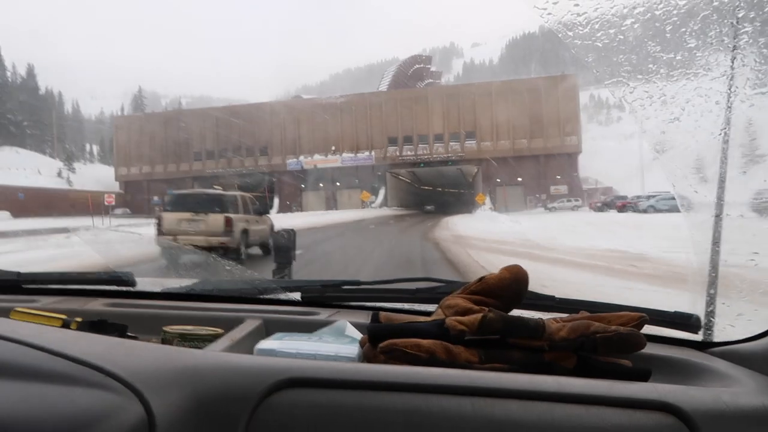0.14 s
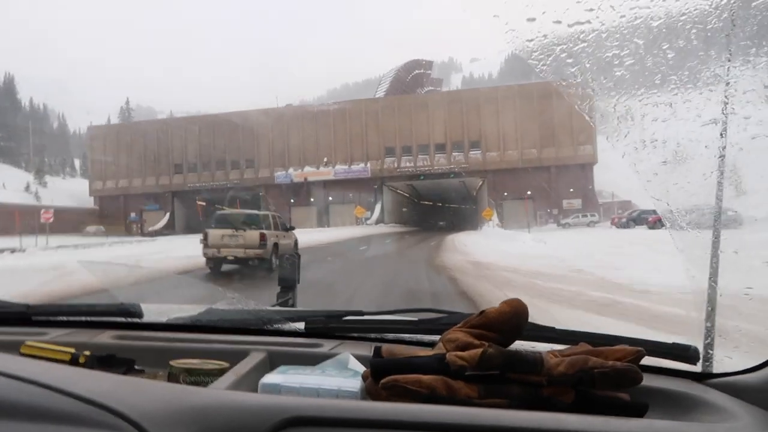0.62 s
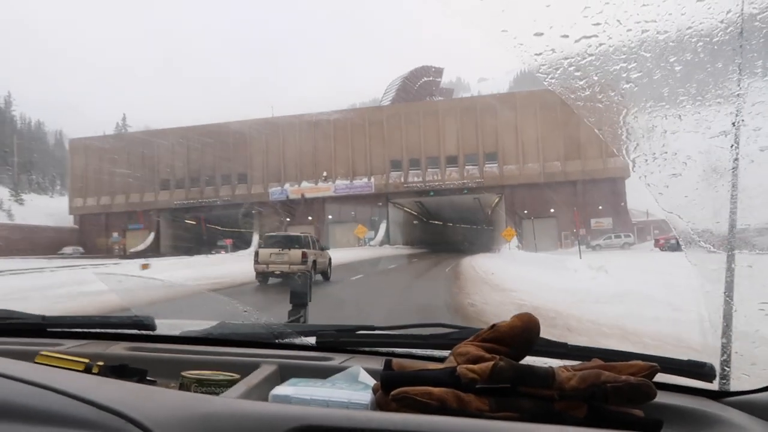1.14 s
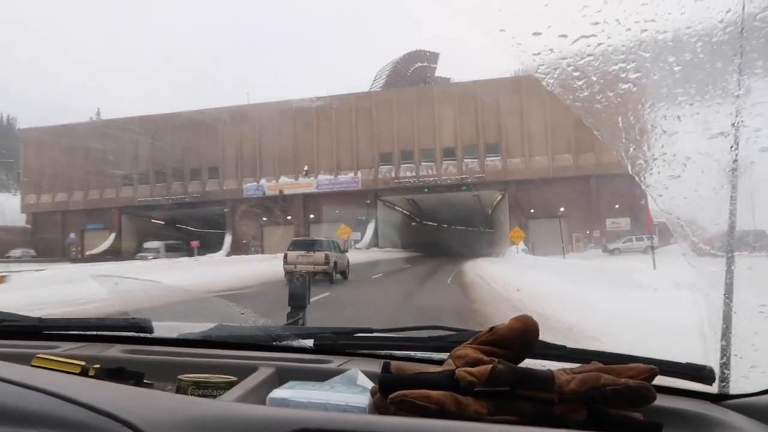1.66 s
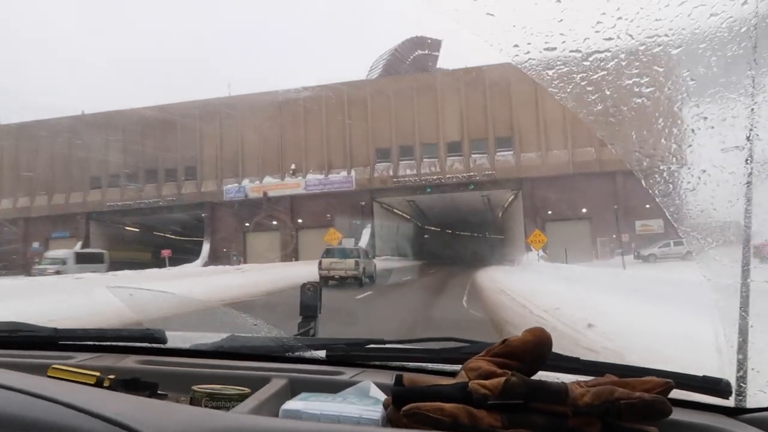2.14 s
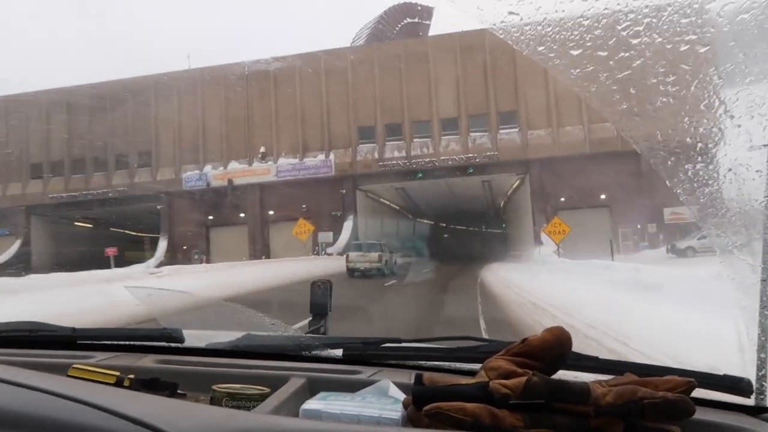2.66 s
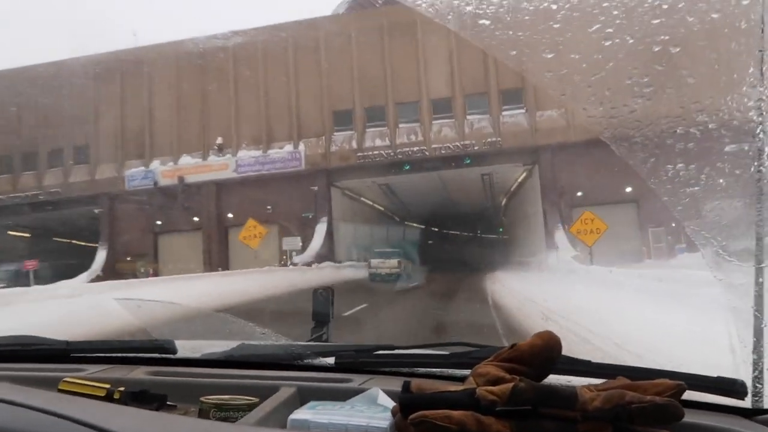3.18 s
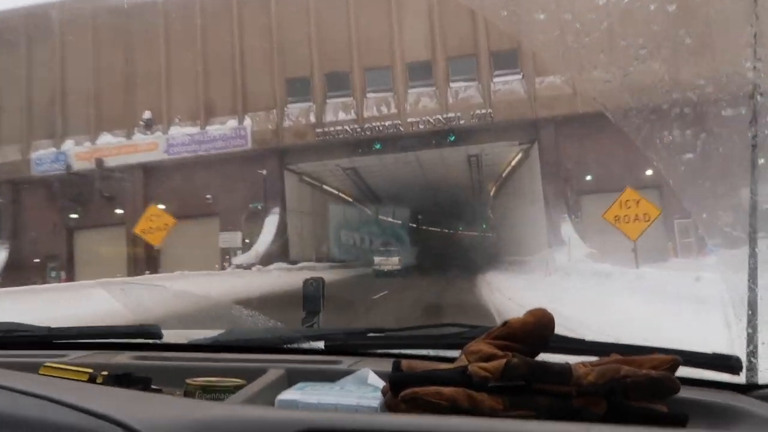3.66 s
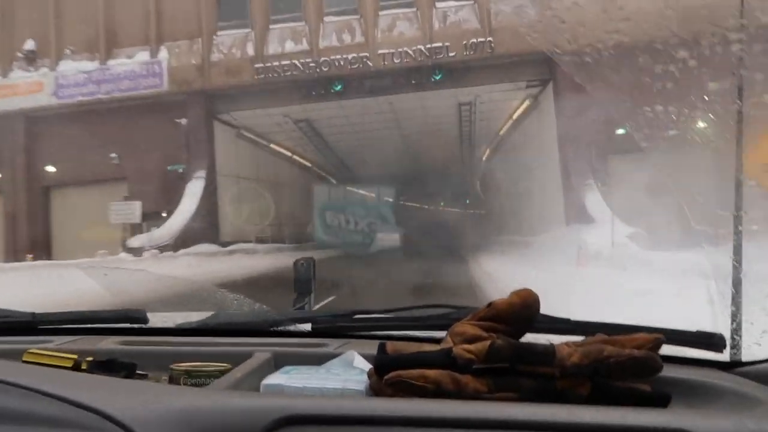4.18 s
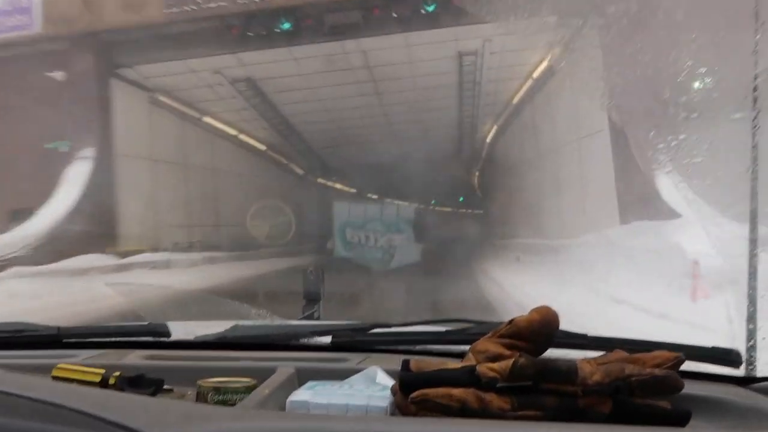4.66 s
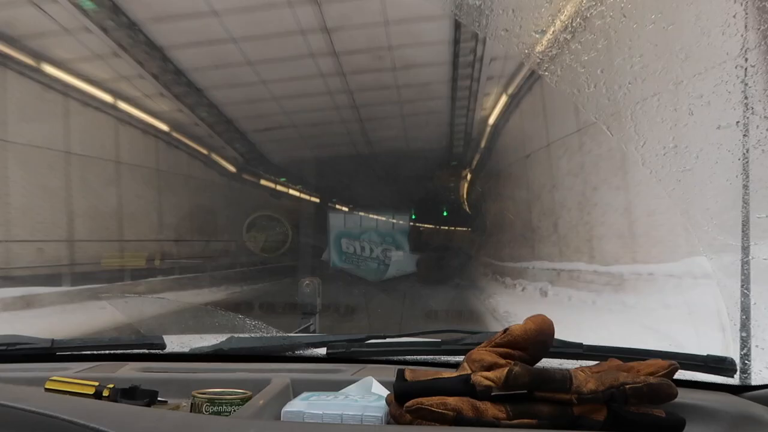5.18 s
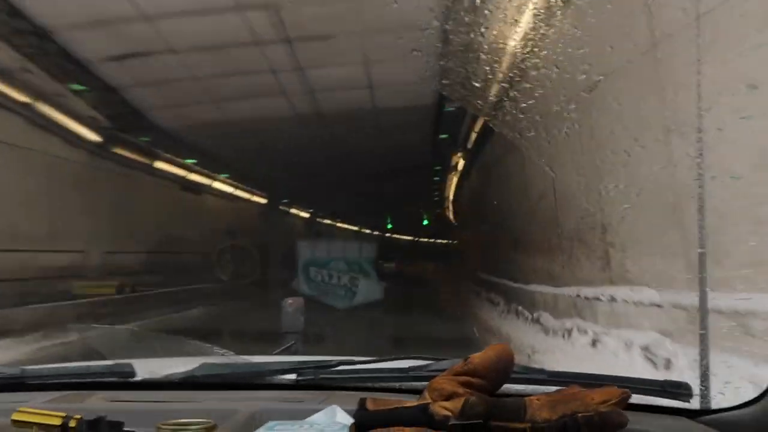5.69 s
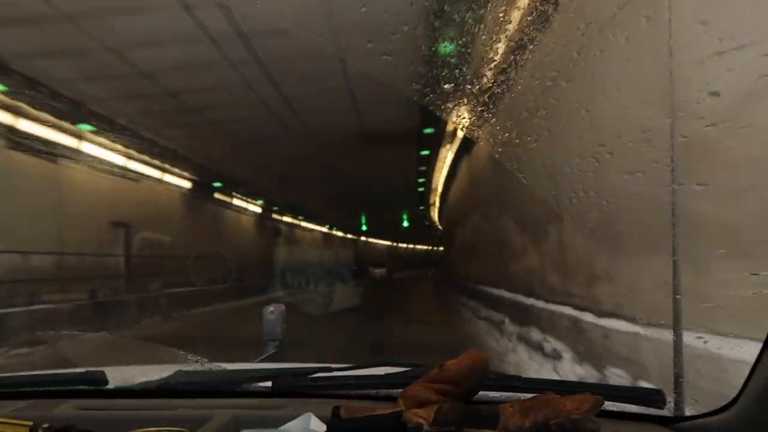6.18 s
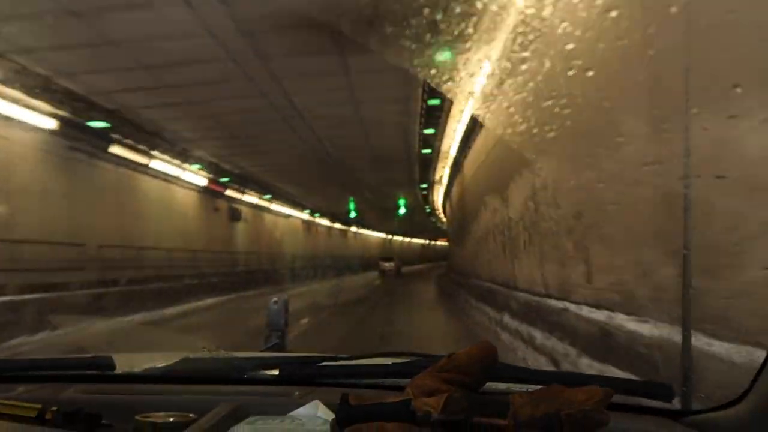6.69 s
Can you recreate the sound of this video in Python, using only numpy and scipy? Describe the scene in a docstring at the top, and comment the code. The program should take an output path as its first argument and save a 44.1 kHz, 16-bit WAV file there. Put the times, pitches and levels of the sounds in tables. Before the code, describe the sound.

Close inside a large pickup cab at nearly steady speed: thick low road rumble dominates, with a smooth eight-cylinder drone and thin gear whine beneath. Soft engine clatter, faint fast metallic ringing and light wet hiss sit above. Small bumps make the bass surge and the level dip briefly. Towards the end tunnel walls return a little midrange tyre noise.

```python
"""Inside the cab of a large eight-cylinder pickup at nearly steady speed on a wet road, nearing and entering a tunnel.
Road rumble is band-shaped noise; the engine gives sine orders, a gear whine and a clatter repeated every cycle.
Metal rings pulse once a cycle, air and spray hiss above, and the walls throw tyre noise back.
At each bump the rumble surges against the rest and the overall level dips, then creeps back.
Two close microphone ports hear it with a tiny bass lag and diffuse noise between them; one faint dull knock falls."""
import sys
import numpy as np
from scipy import signal
from scipy.fft import rfft, irfft, next_fast_len
from scipy.io import wavfile

SR = 44100
rng = np.random.default_rng(int(sys.argv[2]) if len(sys.argv) > 2 else 0)


def master_out(mix):
    """Clip the mix to full scale and print it as 16-bit PCM to the path in sys.argv[1]."""
    frames = np.transpose(np.atleast_2d(mix))
    ceiling = np.clip(frames, -1, 1)
    pcm = np.round(ceiling * 32767).astype(np.int16)
    wavfile.write(sys.argv[1], SR, pcm)


def boost_factor(decibels):
    """Convert a level in decibels to a linear amplitude factor."""
    exponent = np.asarray(decibels, float) / 20
    return 10 ** exponent


N = 300762   # samples

# Levels "re overall" are gains against the overall level curve; spectra give relative level per Hz.
# Road rumble in the cab: [f/Hz, level/dB]
RUMBLE = [(15, -60.5), (25, -40.5), (50, -24), (80, -19), (116, -2), (129, 2), (143, -5), (165, -2),
          (188, -10), (220, -6), (270, -13.5), (320, -33.5), (420, -29), (550, -50)]
# Roughness of the road, as rumble before the bump surges, re overall: [t/s, level/dB]
ROUGHNESS = [(0, 17), (.6, 17), (1.3, 18.5), (2.0, 17), (2.5, 17), (3.3, 17.5), (4.2, 17), (4.9, 17),
             (5.5, 18.5), (6.1, 18), (6.82, 16.1)]
# Bumps in the road and the dip each gives the overall level: [t/s, dip/dB]
BUMPS = [(0.204, 1.1), (0.612, 2.5), (0.736, 2), (0.929, 1.0), (1.494, 3), (1.919, 5), (2.168, 2),
         (2.624, 3), (3.229, 3), (3.41, 0.54), (3.798, 2.5), (3.938, 3), (4.447, 3.5), (4.705, 2),
         (5.059, 3.5), (5.507, 1.75), (5.742, 3.5), (6.346, 5), (6.659, 1)]
SURGE_SHARE = .9   # dB of rumble surge per dB of dip
SURGE_LEAD_S, SURGE_RISE_S, SURGE_FALL_S = 0.032, 0.031, .13
TOP_DB, START_DIP_DB = -28.0, 5.5   # level that the creep heads for; dip still left at the start
DROP_S, CREEP_S = 0.016, 0.93   # time constants of the dip and of the creep back

# Engine speed, as the pitch of the 28th multiple of the cycle rate: [t/s, f/Hz]
SPEED = [(0.0, 462.8), (0.07, 459.5), (0.51, 459.5), (1.75, 464.5), (3.15, 466.1), (4.71, 463.9),
         (6.82, 463.6)]
# Clean engine orders: [multiple of the cycle rate]
ORDER = [3, 4, 5, 8, 10, 11, 16, 18, 21, 24, 29, 35, 40, 44, 53, 54, 57, 59, 63, 64, 72, 74, 79, 84, 91, 96,
         101, 115, 120, 167]
# Their mean levels re overall, in the same sequence: [level/dB]
ORDER_DB = [-9, -3.5, 0.5, 12, -3, -8.5, -14.5, -3, -10.5, -15, -15.5, -21, -12, -15.5, -19, -26, -28.5,
            -18.5, -27.5, -30.5, -17.5, -17.5, -25.5, -18, -29, -20.5, -26, -24.5, -26, -27]
# Gear whine re overall, before its own swell: [t/s, level/dB]
WHINE = [(0, -3.5), (.8, 0.2), (2.2, -3.5), (3.5, 0.5), (4.7, -2.1), (5.4, -1.5), (6.82, -2.3)]
# Engine noise, low, middle and high: [f/Hz, level/dB] each
GROWL = [(200, -36), (300, 1.5), (425, -7), (470, -5), (505, -5.5), (575, -13), (700, -10), (830, -15),
         (950, -16.5), (1200, -44)]
ROAR = [(800, -18.5), (950, -9.5), (1080, 2.5), (1160, -6.5), (1230, 0), (1400, 1), (1480, 0), (1620, -4.5),
        (1720, -2), (1900, -8), (2230, -6.5), (2450, -6), (2750, -8), (2950, -19.5), (3300, -20)]
HISS = [(2600, -15), (3100, -4), (4000, -8.5), (4600, -9), (5300, -10), (6000, -11.5), (6800, -13.5),
        (7600, -17.5), (8500, -25.5), (9500, -22.5), (11000, -29), (13000, -22.5), (15000, -37)]
GROWL_DB, ROAR_DB, HISS_DB = 2, -7.5, -18.5   # re overall, in the open
# Repeating part of the engine noise against its steady part: [f/Hz, level/dB]
CLATTER = [(300, -12), (600, -6), (900, -3), (1500, -2), (2200, -2), (2800, -3), (3300, -7), (6000, -12)]
# Bulkhead resonances that the clatter excites along with the rings: [f/Hz, level/dB]
BULKHEAD = [(1500, -26), (1600, -2.5), (1690, 1.3), (1780, -18.5), (2450, -24.5), (2650, -12.5), (2780, -9),
            (2900, -30)]
BULKHEAD_DB, BULKHEAD_FOLLOWS = -14.5, .6   # mean re overall; share of the rings' swing
# Metal rings excited once a cycle: [f/Hz, pitch wander/Hz, level among them/dB, place in the cycle 0-1]
RINGS = [(5240, 34, 0, .77), (5920, 30, -10, .77), (6700, 40, -9, .3), (7110, 20, -14, .77),
         (4820, 25, -9, .25), (4960, 25, -10, .5), (5480, 30, -11, .1), (6300, 60, -8, .6)]
# Gain of all the rings re overall: [t/s, level/dB]
RINGING = [(0, -33), (.45, -27), (1.2, -29), (1.7, -27), (2.5, -27.5), (3.1, -26), (3.6, -31), (4.5, -33),
           (5.2, -31), (6.82, -34)]

# How closely walls surround the road: [t/s, share 0-1]
WALLED = [(0, 0.01), (2.6, 0.3), (3.8, 0.2), (5.2, 0.4), (6.2, 1), (6.82, 0.9)]
# Tyre noise thrown back by the walls: [f/Hz, level/dB]
WALL_ECHO = [(600, -27), (800, -6.5), (1050, -2), (1300, -0.5), (1500, -10), (1800, -30.5)]
WALL_ECHO_DB = -6.5   # re overall, when fully walled
WALL_ROAR_DB, WALL_HISS_DB, WALL_AROUND_DB = -0.5, 0.2, 0.1   # change when fully walled
# Slush on the wheel arches: [f/Hz, level/dB]
SPRAY = [(3500, -26), (5000, -11.5), (6200, -.1), (7500, -2), (8800, -8.5), (10500, -16), (12000, -28)]
# Wetness of the road, as spray re overall: [t/s, level/dB]
WETNESS = [(0, -36.5), (1.0, -28), (1.8, -28.5), (2.4, -37), (3.2, -32.5), (4.0, -33.5), (6.82, -39.5)]
# Faint dull knock, its burst scale before the low-pass: [t/s, level/dB]
TICK = [(1.858, -19.5)]
# Diffuse noise that differs between the ports: [f/Hz, level/dB]
AROUND = [(350, -31), (560, -7), (750, -7.5), (900, -2.5), (1100, -7.5), (1400, -4.5), (1630, 1),
          (2000, -8.5), (2750, -4), (3200, -13), (5300, -10.5), (7000, -11), (9000, -20.5), (13000, -21),
          (15200, -26.5)]
AROUND_DB = -14.5   # re overall, in the open
# Share of the cab bass heard as a lag between the ports: [f/Hz, level/dB]
LAGGING = [(20, -7), (60, -10.5), (120, 0), (300, 0.5), (480, -6), (540, -16.5), (700, -24)]
HALF_LAG_S = 6.4e-5   # left leads and right trails by this, times the share above


def rms_one(x):
    """Normalisation: scale to unit rms."""
    return x / np.sqrt(np.mean(x ** 2) + 1e-20)


def in_time(rows):
    """Linear interpolation: a two-column table as a curve, one value a sample."""
    t, values = np.transpose(rows)
    return np.interp(np.arange(N) / SR, t, values)


def at_hz(points, hz):
    """Logarithmic frequency axis: read a spectrum between its points; beyond its ends it is silent."""
    f, level_db = np.transpose(points)
    return np.interp(np.log(hz + 1), np.log(f), level_db, left=-120, right=-120)


def drift(rate_hz):
    """Low-pass filtered chance: a two-pole smoother makes a slow random curve of rms about 1."""
    step = 40   # samples between computed points
    pole = np.exp(-2 * np.pi * rate_hz * step / SR)
    white = rng.standard_normal(N // step + 2002)
    slow = signal.lfilter([1], [1, -2 * pole, pole * pole], white)[2000:]   # settled part only
    return np.interp(np.arange(N) / step, np.arange(len(slow)), rms_one(slow))


def noise(spectrum, patchy_db, rate_hz):
    """Spectral shaping of white noise; overlapping octave bands each flicker a little; rms 1."""
    size = next_fast_len(N)
    hz = np.arange(size // 2 + 1) * SR / size
    shaped = rfft(rng.standard_normal(size)) * boost_factor(at_hz(spectrum, hz))
    low, high = np.log2(spectrum[0][0]), np.log2(spectrum[-1][0])
    out = np.zeros(N)
    for centre in np.arange(np.floor(low), np.ceil(high) + 1):
        share = np.clip(1 - abs(np.log2(hz + 1) - centre), 0, 1)
        band = irfft(shaped * share, size)[:N]
        out += band * boost_factor(patchy_db * drift(rate_hz))
    return rms_one(out)


def after_bumps(lead_s, rise_s, fall_s):
    """Superposed transients: each bump rises quickly and decays exponentially, scaled by its dip in dB."""
    out = np.zeros(N)
    for t, dip_db in BUMPS:
        age = np.arange(N) / SR - t + lead_s
        rise = (1 + np.tanh(age / (2 * rise_s))) / 2
        out += dip_db * rise * np.exp(-np.maximum(age, 0) / fall_s)
    return out


def overall_level_db():
    """Exponential recovery: the level dips at each bump and creeps back."""
    start_dip = START_DIP_DB * np.exp(-np.arange(N) / SR / CREEP_S)
    return TOP_DB - start_dip - after_bumps(0, DROP_S, CREEP_S)


def road_rumble():
    """Random excitation of the cab by the road: low noise that swells with roughness and bumps."""
    surge_db = SURGE_SHARE * after_bumps(SURGE_LEAD_S, SURGE_RISE_S, SURGE_FALL_S)
    return boost_factor(in_time(ROUGHNESS) + surge_db) * noise(RUMBLE, patchy_db=0.1, rate_hz=6.8)


def orders(cycles):
    """Harmonic synthesis: firing, gear and panel tones locked to the crank; high ones swell most."""
    out = np.zeros(N)
    for k, level_db in zip(ORDER, ORDER_DB):
        swell_db = (-1.0 + 0.025 * k) * drift(1.6)   # steadiest at the 40th multiple
        tone = np.sin(2 * np.pi * (k * cycles + rng.random()))
        out += np.sqrt(2) * boost_factor(level_db + swell_db) * tone
    return out


def gear_whine(cycles):
    """Meshing tone: a sine at the 28th multiple of the cycle rate with a randomly swelling level."""
    level_db = in_time(WHINE) + 1.0 * drift(5.4)
    return np.sqrt(2) * boost_factor(level_db) * np.sin(2 * np.pi * 28 * cycles)


def clatter(spectrum, cycles, cycle_hz):
    """Periodicity: valves and combustion knocks, smeared by the cab into noise that returns every cycle."""
    size = 8192   # points in one cycle
    hz = np.arange(size // 2 + 1) * cycle_hz.mean()
    pattern = rfft(rng.standard_normal(size)) * boost_factor(at_hz(spectrum, hz))
    whole_rms = np.sqrt(np.mean(irfft(pattern) ** 2))
    one_cycle = irfft(pattern * boost_factor(at_hz(CLATTER, hz))) / whole_rms
    closed = np.append(one_cycle, one_cycle[0])
    return np.interp(cycles % 1 * size, np.arange(size + 1), closed)


def engine_noise(spectrum, cycles, cycle_hz, patchy_db=0.4, rate_hz=9.3):
    """Sum of aperiodic and periodic parts: steady noise plus the clatter in the same colour."""
    return noise(spectrum, patchy_db, rate_hz) + clatter(spectrum, cycles, cycle_hz)


def bulkhead(cycles, cycle_hz):
    """Panel resonance: narrow bands of engine noise whose level partly follows the rings."""
    ring_db = in_time(RINGING)
    level_db = BULKHEAD_DB + BULKHEAD_FOLLOWS * (ring_db - ring_db.mean())
    return boost_factor(level_db) * engine_noise(BULKHEAD, cycles, cycle_hz, patchy_db=1.6, rate_hz=6.7)


def engine_hiss(cycles, cycle_hz, walled):
    """Amplitude modulation: treble engine noise pulses slightly within the cycle, from uneven cylinders."""
    knock_db = .4 * np.cos(2 * np.pi * (cycles - .75)) + .6 * np.cos(4 * np.pi * (cycles - .3))
    return boost_factor(HISS_DB + WALL_HISS_DB * walled + knock_db) * engine_noise(HISS, cycles, cycle_hz)


def rings(cycles):
    """Modal ringing: thin tones of wandering pitch, beeping once a cycle, each coming and going slowly."""
    out = np.zeros(N)
    for hz, wander_hz, level_db, place in RINGS:
        pitch_hz = hz + wander_hz * drift(30)
        tone = np.sin(2 * np.pi * np.cumsum(pitch_hz) / SR)
        swell_db = (7 + 1.5 * drift(2)) * np.cos(2 * np.pi * (cycles - place))
        swell_db += 2.5 * drift(9) - .25 * level_db * drift(.7)   # weaker rings come and go more
        out += boost_factor(level_db) * rms_one(tone * boost_factor(swell_db))
    return boost_factor(in_time(RINGING)) * out


def wall_echo(walled):
    """Reflection: tyre noise thrown back, its power proportional to the walled share."""
    return boost_factor(WALL_ECHO_DB) * np.sqrt(walled) * noise(WALL_ECHO, patchy_db=1.6, rate_hz=15.0)


def spray():
    """Random impacts as shaped noise: slush on the wheel arches, following the wetness of the road."""
    return boost_factor(in_time(WETNESS)) * noise(SPRAY, patchy_db=4.0, rate_hz=9.0)


def tick():
    """Damped oscillation: noise dying in a few milliseconds around a low plastic mode."""
    out = np.zeros(N)
    for t, level_db in TICK:
        age = np.arange(1500) / SR
        source = np.sin(2 * np.pi * 700 * age) + 0.48 * rng.standard_normal(1500)
        out[round(t * SR):][:1500] += boost_factor(level_db) * np.exp(-age / 0.0041) * source
    return signal.sosfilt(signal.butter(2, 2500, fs=SR, output="sos"), out)


def diffuse_noise(walled):
    """Incoherent field: noise that reaches the two ports in opposite sign."""
    return boost_factor(AROUND_DB + WALL_AROUND_DB * walled) * noise(AROUND, patchy_db=0.5, rate_hz=8.0)


def port_lag(bass):
    """First-order delay: the time derivative of the bass, times the lag, separates the ports."""
    hz = np.arange(N // 2 + 1) * SR / N
    derivative = rfft(bass) * 2j * np.pi * hz
    return irfft(derivative * HALF_LAG_S * boost_factor(at_hz(LAGGING, hz)), N)


def scene():
    """Superposition: all layers but the knock follow the overall level and reach two ports."""
    walled = np.clip(in_time(WALLED), 0, 1)
    cycle_hz = in_time(SPEED) / 28
    cycles = np.cumsum(cycle_hz) / SR
    growl = boost_factor(GROWL_DB) * engine_noise(GROWL, cycles, cycle_hz)
    bass = road_rumble() + orders(cycles) + gear_whine(cycles) + growl
    roar = boost_factor(ROAR_DB + WALL_ROAR_DB * walled) * engine_noise(ROAR, cycles, cycle_hz)
    roar = roar + bulkhead(cycles, cycle_hz) + wall_echo(walled)
    treble = engine_hiss(cycles, cycle_hz, walled) + rings(cycles)
    mid = bass + roar + treble + spray()
    lean = -.07 * roar - .015 * bass   # a little to the right
    side = port_lag(bass) + lean + diffuse_noise(walled)
    return boost_factor(overall_level_db()) * np.array([mid + side, mid - side]) + tick()


def top_cut(x):
    """Nothing passes above the cut-off."""
    return signal.sosfilt(signal.butter(12, 15100, fs=SR, output="sos"), x)


def record(dry):
    """Soft saturation: a hyperbolic tangent rounds the peaks."""
    mix = 0.95 * np.tanh(dry / 0.85)
    return top_cut(mix)


dry = scene()
out = record(dry)
master_out(out)
```